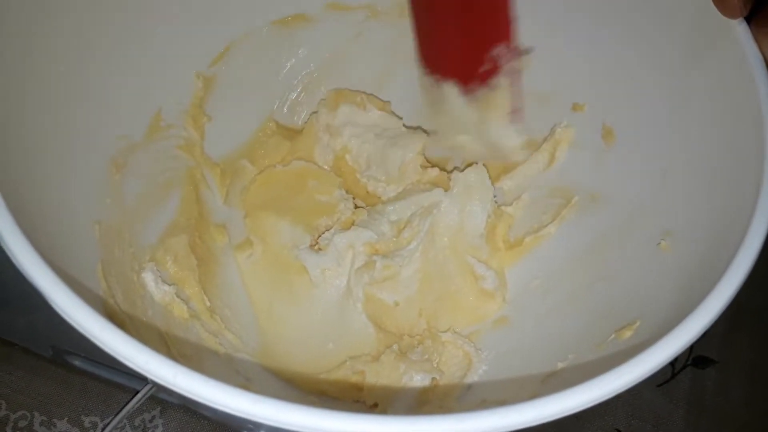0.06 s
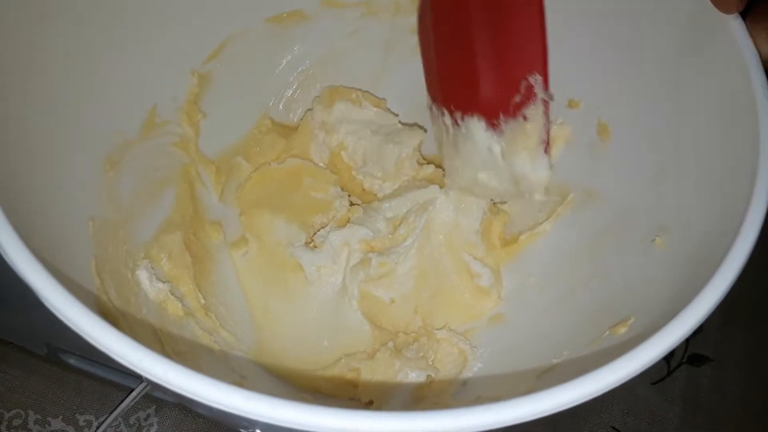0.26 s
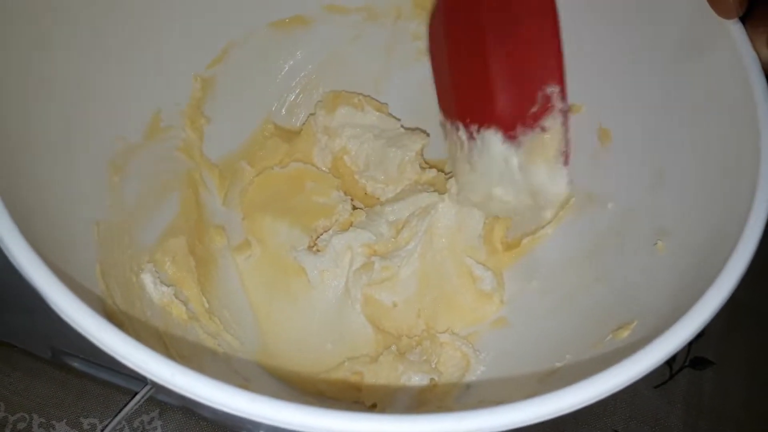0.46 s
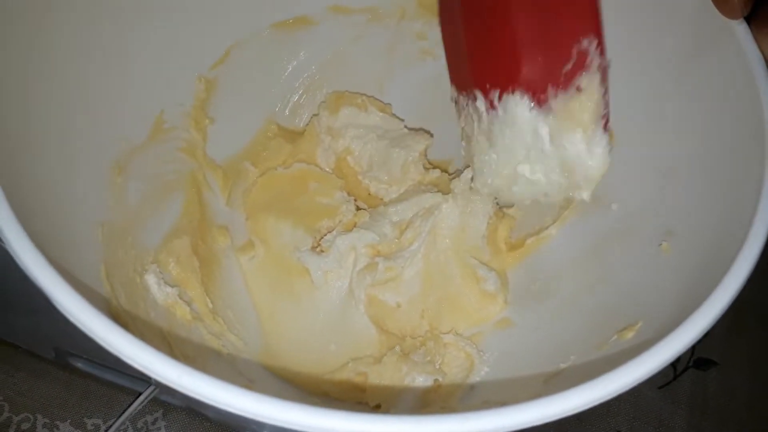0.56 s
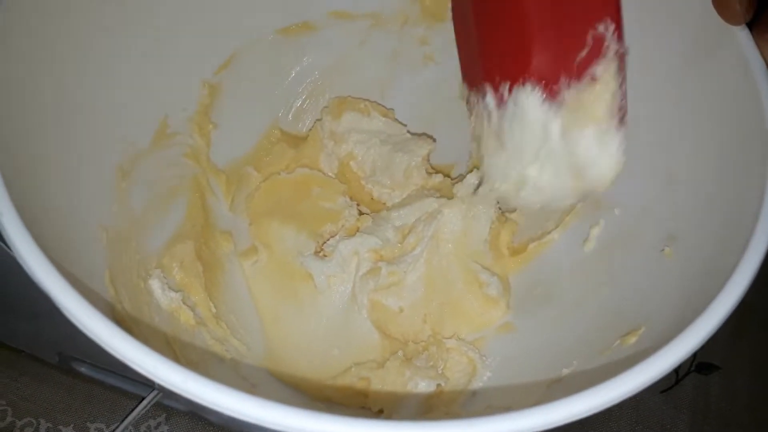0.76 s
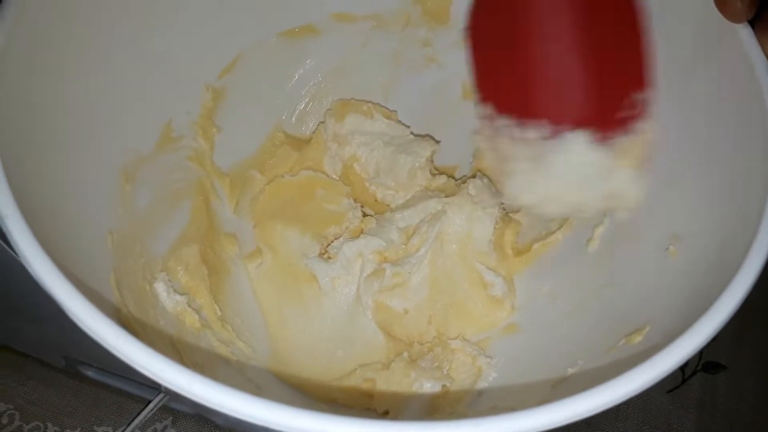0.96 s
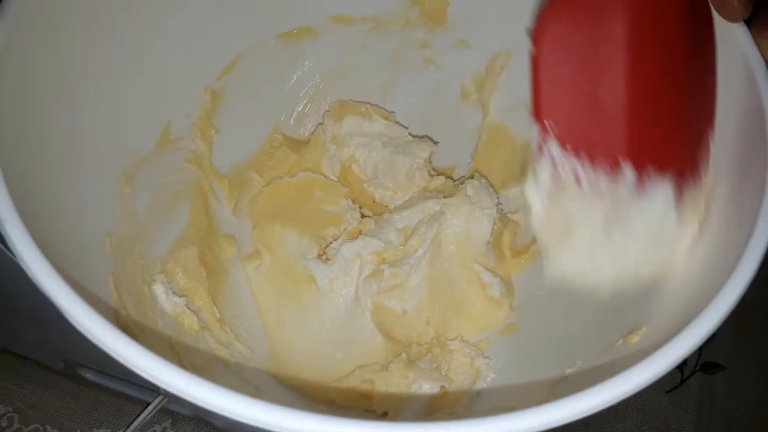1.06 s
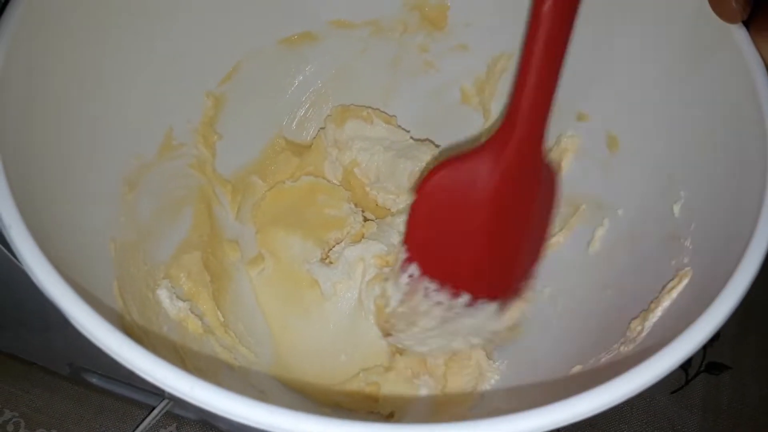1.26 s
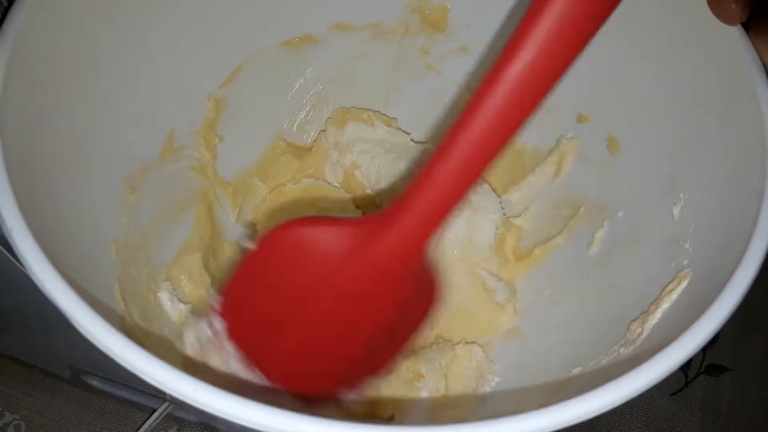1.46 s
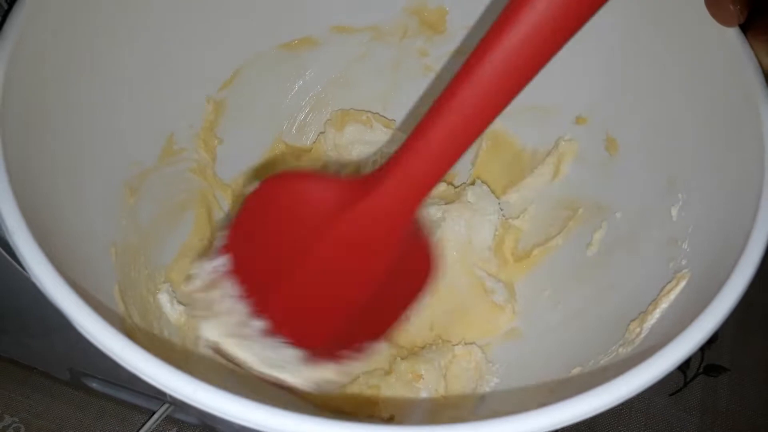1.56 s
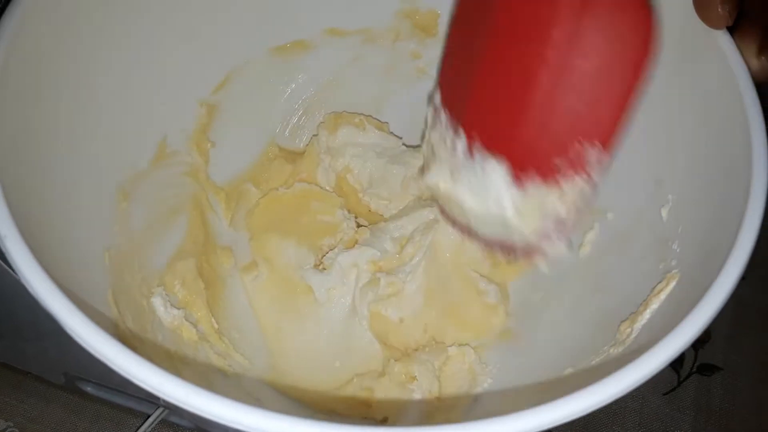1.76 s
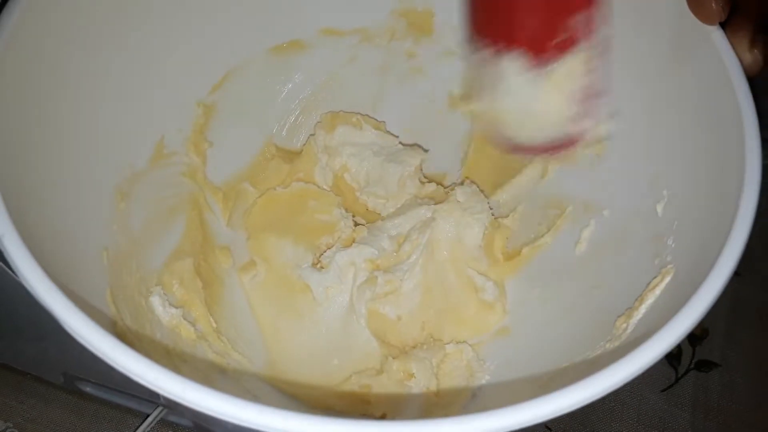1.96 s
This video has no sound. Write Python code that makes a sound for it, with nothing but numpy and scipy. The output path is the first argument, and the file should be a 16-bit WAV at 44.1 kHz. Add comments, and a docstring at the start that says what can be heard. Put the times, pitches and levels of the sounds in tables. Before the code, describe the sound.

Four dull hollow knocks on a plastic bowl, followed by two short, raspy spatula scrapes

```python
"""A silicone spatula is knocked four times on the rim of a plastic mixing bowl, then scrapes its wall in two strokes.
Knocks are impulsively excited modes and cracks of noise; scrapes are stick-slip clicks, partly through wall resonances.
Sticky cream lets go in brief noise puffs, and a small kitchen answers with a short tail of decaying noise.
Shaped room noise, faint narrow-band whirrs and the gliding sine of a far bird lie below."""
import sys
import numpy as np
from scipy import signal
from scipy.fft import rfft, irfft
from scipy.io import wavfile

SR = 44100
rng = np.random.default_rng(int(sys.argv[2]) if len(sys.argv) > 2 else 0)


def volts_from_db(level):
    """Convert decibel levels to linear amplitude ratios."""
    exponent = np.asarray(level, float) / 20
    return 10 ** exponent


def materialize(psi):
    """Save the field psi as 16-bit PCM at rate SR to the path in sys.argv[1].

    A 1-D psi becomes a single channel; in a 2-D psi each row is a channel.
    """
    bounded = np.clip(np.atleast_2d(psi).T, -1, 1)
    quanta = np.round(bounded * 32767).astype(np.int16)
    wavfile.write(sys.argv[1], SR, quanta)


N = 88200


def rms_one(x):
    """Normalization: scales a signal to unit root mean square."""
    return x / np.sqrt(np.mean(x ** 2) + 1e-20)


def at_hz(points, hz):
    """Interpolation on a logarithmic frequency axis."""
    point_hz, value = np.transpose(points)
    return np.interp(np.log(hz), np.log(point_hz), value)


def colour(x, spectrum):
    """Zero-phase spectral shaping: weights each frequency of a signal by the spectrum; rms 1."""
    hz = np.arange(N // 2 + 1) * SR / N + 1  # 1 Hz up, to avoid log 0
    return rms_one(irfft(rfft(x) * volts_from_db(at_hz(spectrum, hz)), N))


def drift(rate_hz):
    """Low-pass random process: white noise through two equal poles gives slow wandering of rms 1."""
    r = np.exp(-2 * np.pi * rate_hz / SR)
    white = rng.standard_normal(N + SR)
    return rms_one(signal.lfilter([1], [1, -2 * r, r * r], white)[SR:])  # first second settles


def resonance(x, hz, width_hz):
    """Damped second-order resonance: a band-pass with gain 1 at its peak."""
    r = np.exp(-np.pi * width_hz / SR)
    zeros = np.array([1, 0, -1]) * (1 - r * r) / 2
    return signal.lfilter(zeros, [1, -2 * r * np.cos(2 * np.pi * hz / SR), r * r], x)


# spectrum of the room noise: (frequency [Hz], level per hertz [dB])
HUSH_SPECTRUM = [(15, -42), (30, -12), (50, -31), (70, -12), (110, -2), (185, -1), (309, -9.5),
                 (476, -10.5), (840, -12.5), (1230, -17.5), (2280, -15.5), (3200, -24), (4370, -26.5),
                 (5280, -33), (6210, -31), (8590, -35.5), (16000, -41.5)]
# course of the room noise: (time [s], level [dB])
HUSH_LEVEL = [(0, -55), (.2, -60), (1.3, -60.5), (1.8, -62.5), (2, -59)]


def room_noise():
    """Stationary broadband noise: a fixed spectrum under a slowly wandering level."""
    t = np.arange(N) / SR
    level_db = np.interp(t, *np.transpose(HUSH_LEVEL)) + 1.0 * drift(12)
    return volts_from_db(level_db) * colour(rng.standard_normal(N), HUSH_SPECTRUM)


# narrow whirrs, as of insects or an appliance: (frequency [Hz], width of each pass [Hz], level [dB])
WHIRRS = [(234, 14, -74), (6080, 260, -86), (6650, 200, -84)]


def whirrs():
    """Narrow-band noise: white noise passed twice through a resonance, its level wavering."""
    out, white = 0, rng.standard_normal(N)
    for hz, width_hz, level_db in WHIRRS:
        band = resonance(resonance(white, hz, width_hz), hz, width_hz)
        out = out + volts_from_db(level_db + 2.5 * drift(5)) * rms_one(band)
    return out


# sticky cream lets go: (time [s], level [dB], length [s], centre frequency [Hz])
SMACKS = [(.095, -66, .01, 3000), (.264, -56, .005, 9000), (.293, -56, .008, 4500), (.7305, -56, .01, 7000),
          (.7545, -60, .003, 14500), (1.825, -76, .01, 7000)]


def smacks():
    """Brief broadband release: each puff is band-passed noise under a half-sine envelope."""
    out, t, white = 0, np.arange(N) / SR, rng.standard_normal(N)
    for start, level_db, length, hz in SMACKS:
        envelope = np.sin(np.pi * np.clip((t - start) / length, 0, 1))
        out = out + volts_from_db(level_db) * envelope * rms_one(resonance(white, hz, .7 * hz))
    return out


# reverberation of the kitchen: (frequency [Hz], time to fall 60 dB [s])
ROOM_T60 = [(80, 0.67), (210, 0.51), (560, 0.21), (1470, 0.4), (3880, 0.44), (9000, 0.44), (15000, 0.31)]


def kitchen(x):
    """Diffuse reverberation: convolution with noise whose half-octave bands decay exponentially."""
    build_up_s = 0.0046
    t, tail = np.arange(SR) / SR, 0
    edges = 60 * 2 ** np.arange(0, 8.1, .5)  # Hz
    white = rng.standard_normal((2, SR))
    for k, (low, high) in enumerate(zip(edges, edges[1:])):
        centre_hz = np.sqrt(low * high)
        band_pass = signal.butter(2, [low, high], "band", fs=SR, output="sos")
        band = signal.sosfilt(band_pass, white[k % 2])  # neighbouring bands use separate noise
        tail = tail + band * volts_from_db(-60 * t / at_hz(ROOM_T60, centre_hz))
    tail = tail * (1 - np.exp(-(t / build_up_s) ** 2)) / np.sqrt(SR / 40)
    return signal.fftconvolve(x, tail)[:N]


# knocks on the rim: (time [s], blow [dB], crack [dB], counter boom [dB], room answer [dB],
# brightness [dB per octave])
KNOCKS = [(0.242, -17.5, -20, 1.5, -41.5, 3), (.4694, -19, -26, 3.5, -44, 2.5),
          (0.6677, -18.5, -27, 0.5, -44, 2), (0.8534, -14, -24.5, -2, -42.5, 0)]
# modes of bowl and counter: (frequency [Hz], level [dB], time to fall 60 dB [s])
MODES = [(67, -12, 0.29), (125.8, -11.5, 0.59), (198, -10, 0.101), (306.8, -6, 0.18), (402, -9, 0.13),
         (442, -34, 0.025), (460.7, -9, 0.049), (490.7, -3, 0.045), (659, -3, 0.023), (734, -7, 0.019),
         (841, -17, 0.11), (990, -0.5, 0.021), (1118, -6.5, 0.11), (1900, -32, 0.012), (2367, 1.5, 0.037),
         (3330, -11, .025)]


def bowl_ring():
    """Modal superposition: each soft push, and its rebound, rings every damped mode, pressure falling first."""
    counter_below_hz, radiates_above_hz = 250, 260
    smoothing_s = 0.00079 / 4  # soft contact: time constant of each of three equal poles
    rebound_s, rebound_db, rebound_tilt = .0106, -9.5, -3  # bowl lands back on counter; tilt in dB per octave
    start, blow_db, _, boom_db, _, bright_db = np.transpose(KNOCKS)
    at = (start * SR).astype(int)
    out = np.zeros(N)
    spot_db = 1.8 * rng.standard_normal((len(start), len(MODES)))  # varies each mode from blow to blow
    for k, (hz, mode_db, t60) in enumerate(MODES):
        octaves = np.log2(hz / 400)
        tilt_db = np.where(hz < counter_below_hz, boom_db, bright_db * octaves)
        clicks = np.full(N, 1e-18)
        clicks[at] = volts_from_db(blow_db + mode_db + spot_db[:, k] + tilt_db)
        clicks[at + int(rebound_s * SR)] = clicks[at] * volts_from_db(rebound_db + rebound_tilt * octaves)
        r, w = volts_from_db(-60 / (t60 * SR)), 2 * np.pi * hz / SR
        out -= signal.lfilter([0, np.sin(w)], [1, -2 * r * np.cos(w), r * r], clicks)
    r = np.exp(-1 / (smoothing_s * SR))
    out = signal.lfilter([(1 - r) ** 3], np.poly([r, r, r]), out)
    return signal.sosfilt(signal.butter(2, radiates_above_hz, "high", fs=SR, output="sos"), out)


# spectrum of the crack: (frequency [Hz], level per hertz [dB])
CRACK_SPECTRUM = [(590, -2.5), (1000, 0), (1960, 6), (2910, -6.5), (4070, -4.5), (5310, -22.5),
                  (7700, -8.5), (11000, -24), (14900, -15), (16000, -20)]


def cracks():
    """Transient broadband radiation: after each blow, shaped noise rises fast and decays exponentially."""
    lag_s, rise_s, t60_s = .0016, .0012, .028
    start, crack_db = np.transpose(KNOCKS)[[0, 2]]
    age = np.maximum(np.arange(N) / SR - start[:, None] - lag_s, 0)
    envelope = volts_from_db(crack_db[:, None] - 60 * age / t60_s) * (1 - np.exp(-age / rise_s))
    return envelope.sum(axis=0) * colour(rng.standard_normal(N), CRACK_SPECTRUM)


# how the whole broad blow reaches the walls: (frequency [Hz], level [dB])
BLOW_SPECTRUM = [(60, -24), (130, 2.5), (300, 12), (550, 14.5), (1000, -3), (2000, -5), (4000, -21.5),
                 (8000, -29.5), (15000, -34.5)]


def blows_at_walls():
    """Impulsive excitation of the room: one shaped impulse per knock, to be reverberated."""
    start, room_db = np.transpose(KNOCKS)[[0, 4]]
    blows = np.zeros(N)
    blows[(start * SR).astype(int)] = volts_from_db(room_db - room_db.mean())
    return volts_from_db(room_db.mean()) * colour(blows, BLOW_SPECTRUM)


# scraping strokes, one list each: (time [s], level [dB], treble minus level [dB], bass minus level [dB])
STROKES = [
    [(1.052, -75, -12, -5), (1.062, -60, -14, -6), (1.069, -57, -5, -8), (1.078, -51, -3, -10),
     (1.092, -57, -1, -8), (1.101, -52, -6, -9), (1.118, -46, -8, -15), (1.15, -50, -4, -11),
     (1.165, -45, -7, -8), (1.2, -40, -5, -7), (1.232, -41, -6, -15), (1.241, -47, -7, -12),
     (1.247, -62, -5, -12), (1.29, -59, -8, -10), (1.305, -75, -7, -10)],
    [(1.373, -75, -7, -13), (1.379, -47, -7, -14), (1.391, -38, -8, -21), (1.405, -43, -9, -13),
     (1.435, -47, -7, -12), (1.447, -42, -11, -16), (1.465, -44, -7, -13), (1.48, -43, -5, -14),
     (1.51, -38, -7, -12), (1.525, -42, -1, -12), (1.545, -43, -2, -12), (1.56, -52, -4, -11),
     (1.575, -59, -4, -14), (1.63, -64, -5, -16), (1.645, -78, -5, -16)],
]
# wall resonances under the blade, one list per stroke: (frequency [Hz], width of each pass [Hz], level [dB])
WALL = [
    [(1210, 130, -5), (1870, 330, -1.5), (2580, 380, 0), (3730, 450, -6), (6590, 700, -11), (9430, 450, -8)],
    [(1180, 130, -11), (1830, 330, 0), (2560, 420, -2.5), (3290, 300, -11), (4630, 400, -12),
     (6100, 500, -9), (6820, 500, -9), (9300, 500, -13)],
]
# broad colour of the rubbing: (frequency [Hz], level per hertz [dB])
RUB_SPECTRUM = [(150, -53), (300, -10), (600, -8), (1500, -19.5), (2200, -10), (3900, -11.5), (4600, -14),
                (5400, -14), (6500, -10), (8500, -10.5), (9700, -9), (10400, -15), (12300, -16.5),
                (13600, -13), (15500, -10.5), (16000, -12.5)]


def scrapes():
    """Stick-slip friction: dense random clicks, heard directly and through the resonances of the wall."""
    slips_per_s, slip_spread_db = 12000, 2
    chatter_db, chatter_hz = 1.2, 90
    low_pass = signal.butter(2, 1000, fs=SR, output="sos")
    high_pass = signal.butter(2, 4700, "high", fs=SR, output="sos")
    out, t = 0, np.arange(N) / SR
    for rows, wall in zip(STROKES, WALL):
        time, level_db, treble_db, bass_db = np.transpose(rows)
        happens = rng.random(N) < slips_per_s / SR
        slips = happens * volts_from_db(slip_spread_db * rng.exponential(1, N)) * rng.choice([-1, 1], N)
        rung = 0
        for k, (hz, width_hz, mode_db) in enumerate(wall):
            mode = resonance(resonance(slips, hz, width_hz), hz, width_hz)
            rung = rung + volts_from_db(mode_db) * (-1) ** k * rms_one(mode)  # alternating polarity
        direct = colour(slips[::-1], RUB_SPECTRUM)  # reversed, so that it is independent of the ringing
        rub = direct + rms_one(rung)
        low = signal.sosfiltfilt(low_pass, rub)
        high = signal.sosfiltfilt(high_pass, rub)
        middle = rub - low - high
        press = volts_from_db(np.interp(t, time, level_db, -120, -120) + chatter_db * drift(chatter_hz))
        treble = volts_from_db(np.interp(t, time, treble_db)) * rms_one(high)
        bass = volts_from_db(np.interp(t, time, bass_db)) * rms_one(low)
        out = out + press * (rms_one(middle) + treble + bass)
    return out


# far bird: (time [s], length [s], start frequency [Hz], end frequency [Hz], level [dB])
BIRD = [(1.735, .085, 4270, 4170, -74), (1.8, .19, 4660, 4640, -81)]


def far_bird():
    """Frequency modulation: a gliding, wavering sine under a half-sine envelope."""
    out, t = 0, np.arange(N) / SR
    waver_hz = 25
    for start, length, from_hz, to_hz, level_db in BIRD:
        part = np.clip((t - start) / length, 0, 1)
        hz = from_hz + (to_hz - from_hz) * part + waver_hz * drift(40)
        out = out + volts_from_db(level_db) * np.sin(np.pi * part) * np.sin(2 * np.pi * np.cumsum(hz) / SR)
    return out


def scene():
    """Linear superposition: direct sounds, their reverberation and the background add up."""
    cream, rub = smacks(), scrapes()
    direct = bowl_ring() + cracks() + cream + rub
    reverberation = kitchen(cream + blows_at_walls() + volts_from_db(-13) * rub)  # scrapes reach the room 13 dB down
    background = room_noise() + whirrs() + far_bird()
    return (direct + reverberation + background)[None]


def top_cut(x):
    """Nothing passes above the cut-off."""
    return signal.sosfilt(signal.butter(12, 16610, fs=SR, output="sos"), x)


def record(dry):
    """Band limitation: a steep low-pass, 30 dB down from 16300 Hz, cuts the top."""
    low_pass = signal.cheby2(10, 30, 16300, fs=SR, output="sos")
    mix = signal.sosfilt(low_pass, dry)
    return top_cut(mix)


dry = scene()
out = record(dry)
materialize(out)
```